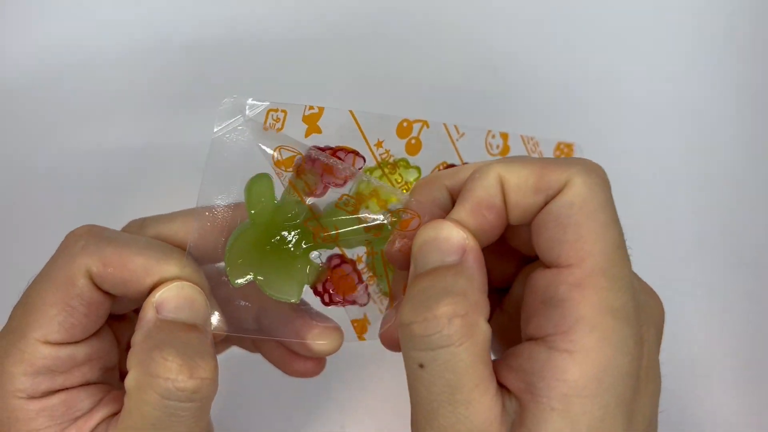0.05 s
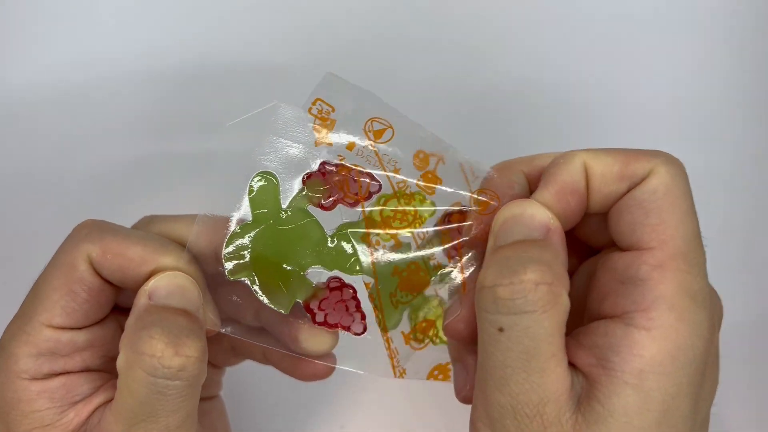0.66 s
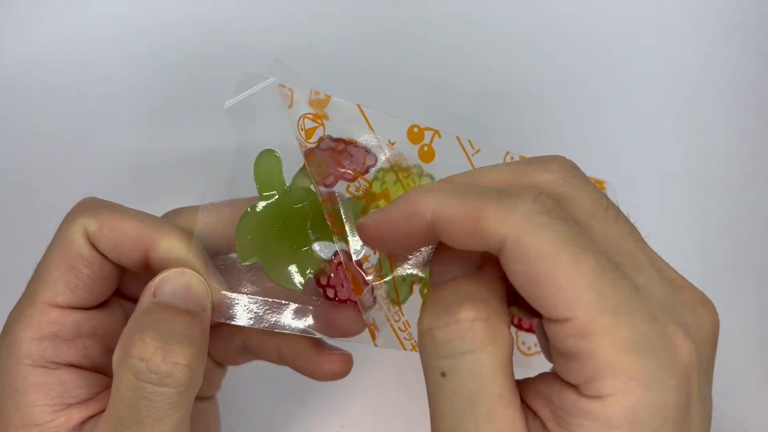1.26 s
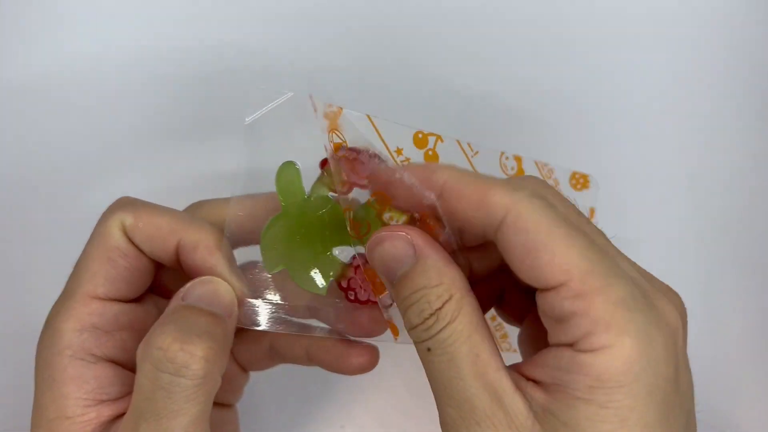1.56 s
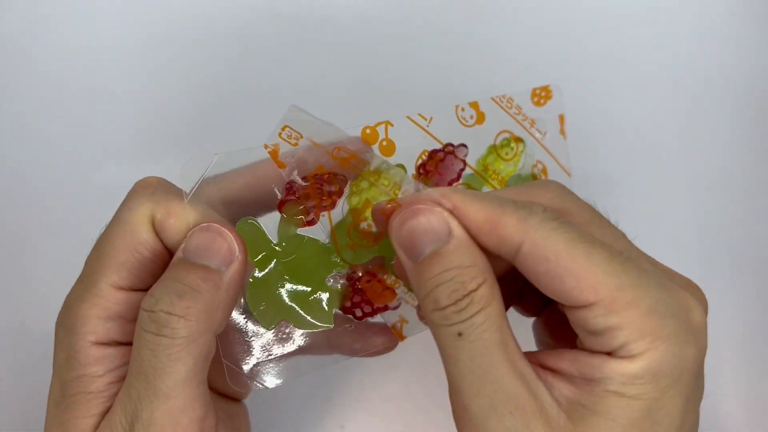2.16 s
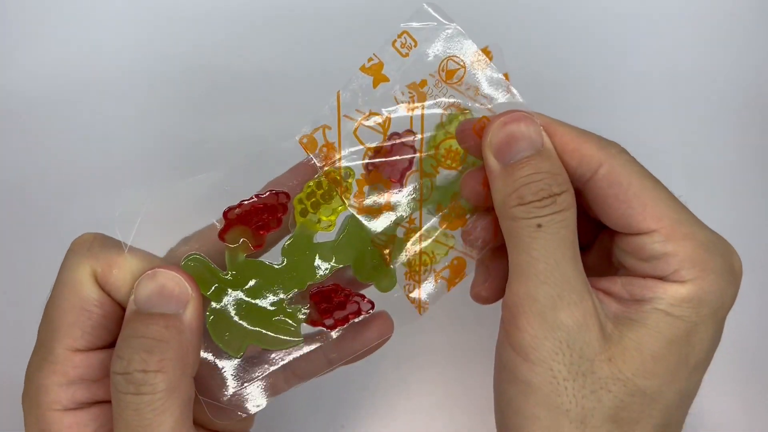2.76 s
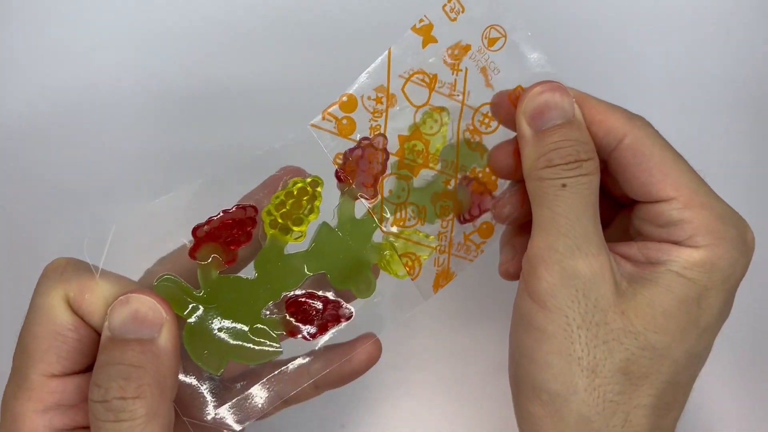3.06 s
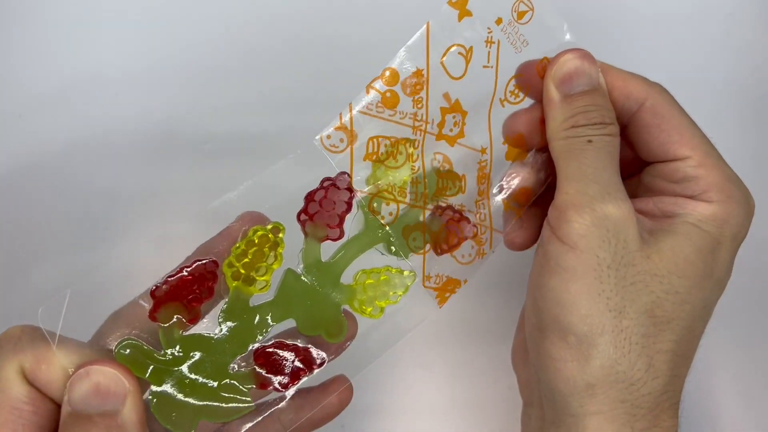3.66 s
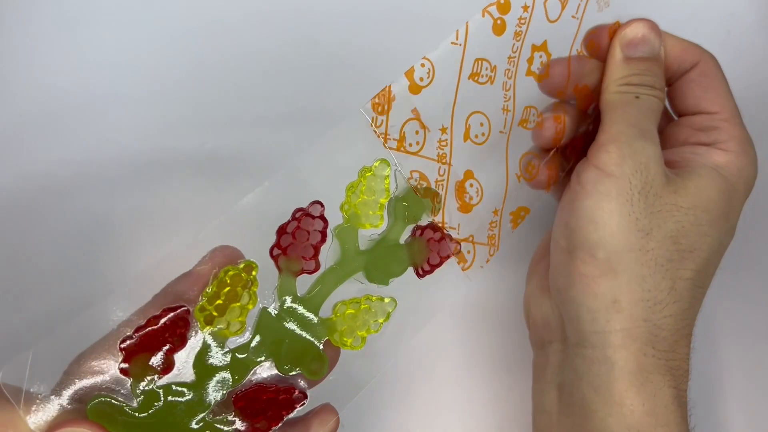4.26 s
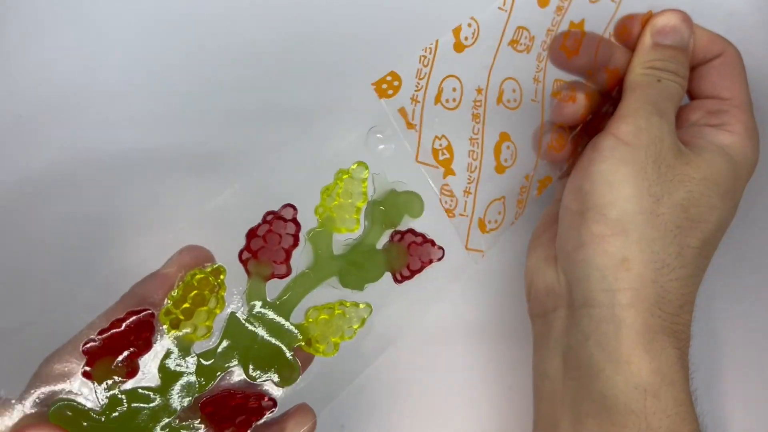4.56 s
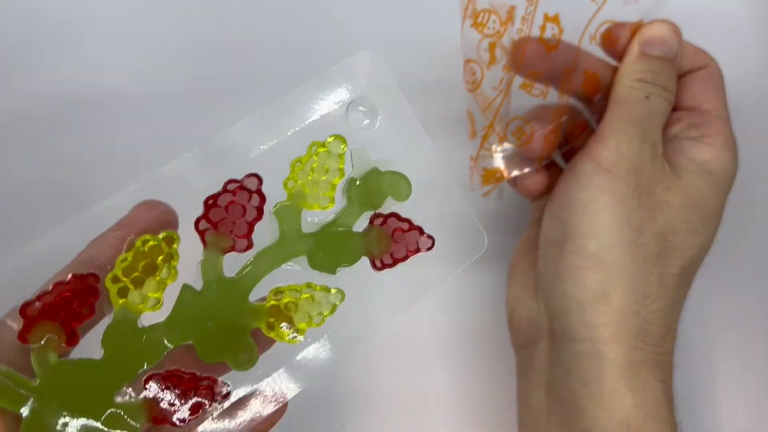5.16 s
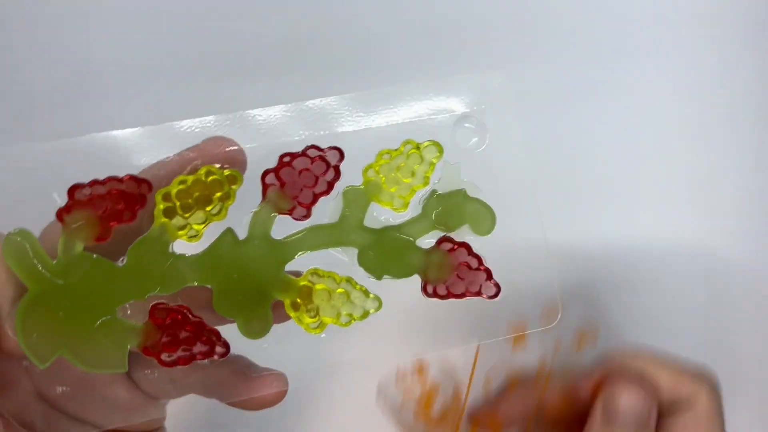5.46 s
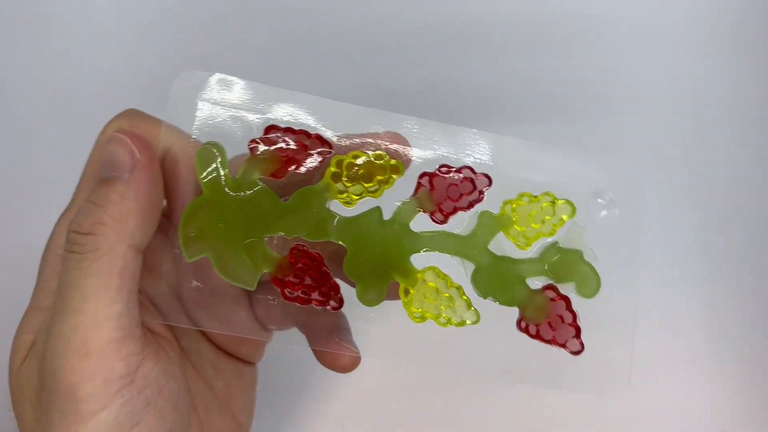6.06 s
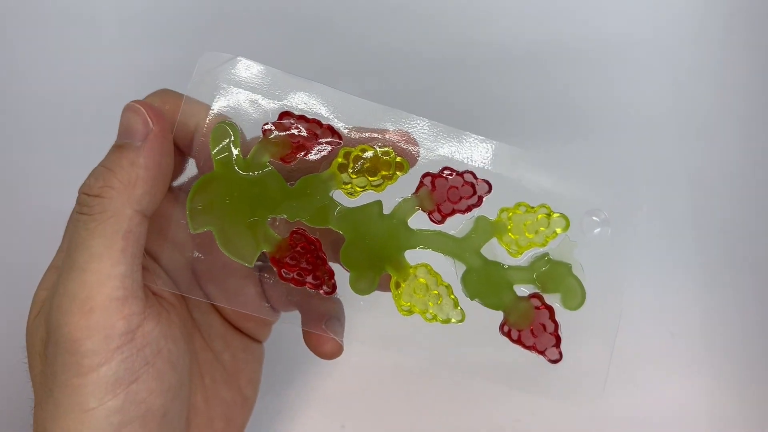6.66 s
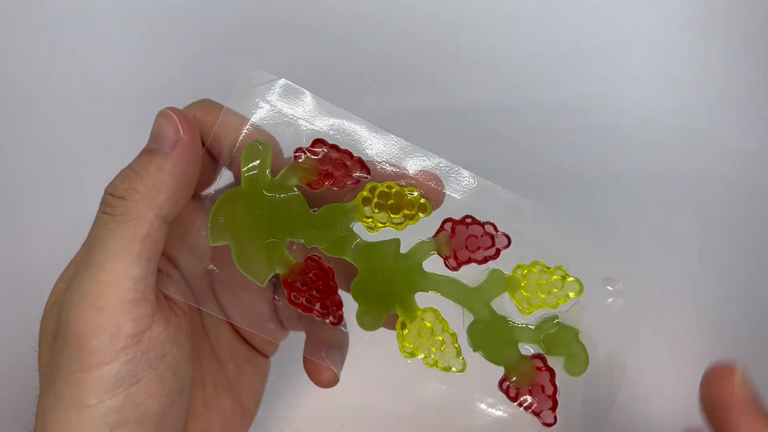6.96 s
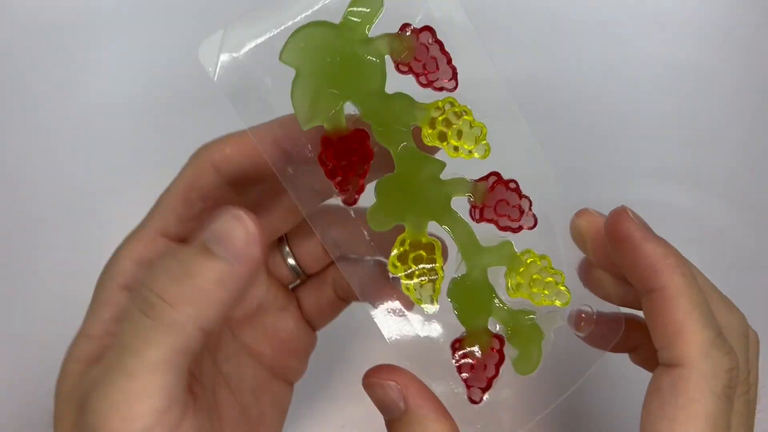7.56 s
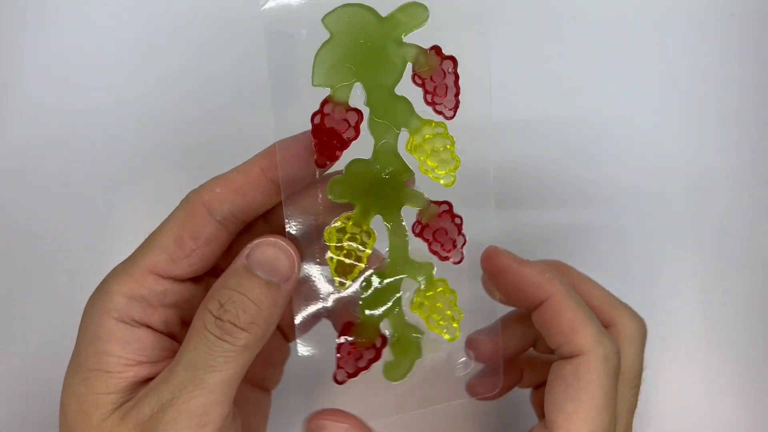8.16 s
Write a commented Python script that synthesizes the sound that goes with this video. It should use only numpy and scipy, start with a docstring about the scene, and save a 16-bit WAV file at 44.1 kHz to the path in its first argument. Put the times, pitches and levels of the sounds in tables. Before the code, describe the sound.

Close up in a quiet little room, plastic film crinkles and crackles in uneven clusters as it is pulled from a candy tray. Bright cracks and dull creaks of the bending tray build to a few short rips and a low thump as the film comes off. The rest is much quieter: skin sliding on plastic and scattered light clicks, over a faint rumble of handling.

```python
"""A small quiet room, close to a phone: thin plastic film is peeled off a moulded candy tray.
The seal lets go in bursts of snaps: each cracks, rings the taut film and knocks the tray, over a fine
crinkle of tiny slips. The last corner tears free with a thump. Then fingers rub the bare tray and turn
it, and it clicks a few times. A low handling rumble runs underneath."""
import sys
import numpy as np
from scipy import signal
from scipy.fft import rfft, irfft, next_fast_len
from scipy.io import wavfile
from scipy.ndimage import map_coordinates

SR = 44100
rng = np.random.default_rng(int(sys.argv[2]) if len(sys.argv) > 2 else 0)


def wav_record(signal):
    """Record a signal, one row per channel, as 16-bit PCM in the file named by sys.argv[1]."""
    frames = np.transpose(np.atleast_2d(signal))
    bounded = np.clip(frames, -1, 1)
    # unit amplitude maps onto the largest positive 16-bit level
    quanta = np.round(bounded * 32767).astype(np.int16)
    wavfile.write(sys.argv[1], SR, quanta)


N = 371322

# Cues and level rides; each layer adds its own trim.
# effort of the peel: t/s, pull on the film/dB, bending of the tray/dB
PEEL_EFFORT = [(0, -49, -58), (.2, -63, -54.5), (.3, -76.5, -70.5), (.48, -64.5, -71), (.7, -68, -53.5),
               (1.02, -77.5, -72), (1.17, -58, -63), (1.6, -58.5, -63), (1.78, -67, -63),
               (2.08, -57, -74.5), (2.37, -56.5, -51), (2.62, -71.5, -66.5), (2.88, -58, -54),
               (3.15, -63.5, -61), (3.7, -60.5, -49.5), (4.2, -65, -60), (4.52, -58.5, -64),
               (4.65, -73, -72.5), (4.88, -59, -60.5), (5.2, -91, -79)]
# the seal tears in a run of slips: middle t/s, length/s, level/dB
SEAL_RIPS = [(0.169, 0.024, -51.5), (2.344, 0.021, -53), (2.904, 0.051, -47.5), (3.696, 0.025, -42.5),
             (3.784, 0.068, -37.5), (4.497, 0.038, -37.5), (4.764, 0.04, -30.5)]
# handling rumble: t/s, level/dB
GRIP_LEVEL = [(0, -65.5), (1.75, -61), (2.03, -87), (2.8, -62), (3.5, -64), (3.78, -49), (4, -55),
              (4.3, -63), (4.52, -45.5), (4.68, -66), (4.84, -36.5), (5.15, -64.5), (6.3, -65.5),
              (8.42, -68)]
# the seal snaps, later the bare tray clicks under the fingers:
# t/s, crack/dB, ring/dB, ring f/Hz, tray knock/dB
PLASTIC_SNAPS = [(0.001, -50, -40.5, 1540, -40), (0.1226, -38.5, -41.5, 2840, -39),
                 (0.153, -35.5, -29, 3930, -33.5), (0.1803, -45, -37.5, 990, -24.5),
                 (0.2006, -31, -34, 1670, -30.5), (0.2152, -35, -41, 5500, -48),
                 (0.5044, -26.5, -33, 4300, -32.5), (0.6323, -34.5, -47, 3900, -39),
                 (0.6385, -34, -37, 3870, -55), (0.667, -27.5, -35, 4000, -46.5),
                 (0.7863, -55, -50, 3180, -64), (0.8449, -47, -43, 4430, -50.5),
                 (0.8741, -35, -30, 2740, -31), (1.0458, -84, -45, 2250, -43.5),
                 (1.229, -33, -34, 3020, -34.5), (1.381, -45, -31.5, 3040, -40.5),
                 (1.4148, -48.5, -42, 2440, -44.5), (1.5598, -34.5, -31.5, 3520, -35),
                 (1.6003, -50, -38, 2800, -43.5), (1.7271, -51, -60.5, 1310, -54),
                 (2.1457, -42, -55, 3500, -62), (2.179, -52.5, -43, 4300, -49),
                 (2.201, -31.5, -36.5, 3200, -31), (2.268, -40.5, -66, 1800, -49),
                 (2.3042, -28, -43.5, 1900, -34.5), (2.3235, -29.5, -39.5, 4280, -37),
                 (2.351, -44, -49.5, 1210, -40.5), (2.4, -27, -25.5, 4116, -28),
                 (2.4335, -43.5, -43, 1178, -36.5), (2.497, -36.5, -45.5, 3420, -41),
                 (2.5413, -46, -41.5, 1740, -34.5), (2.655, -49, -60, 4600, -57),
                 (2.7873, -50, -51, 1500, -47), (2.8248, -32.5, -48.5, 5220, -47),
                 (2.8431, -29.5, -45, 4300, -43), (2.88, -35, -45, 4300, -43.5),
                 (2.968, -37.5, -46, 3055, -48.5), (3.0355, -34, -46, 4850, -48),
                 (3.2058, -44.5, -49.5, 2846, -44.5), (3.2371, -18, -24, 2993, -27),
                 (3.279, -41.5, -39.5, 1300, -37), (3.345, -29.5, -43.5, 6100, -47),
                 (3.4311, -34.5, -40, 1040, -26.5), (3.4817, -41.5, -55.5, 1000, -38),
                 (3.6862, -34.5, -44.5, 1100, -33), (3.7446, -28.5, -34.5, 1210, -31),
                 (3.761, -34, -32, 1000, -20.5), (3.7912, -18, -38.5, 3745, -23.5),
                 (3.8364, -35.5, -50, 2380, -49.5), (4.012, -53.5, -58.5, 1025, -37),
                 (4.2371, -46, -63.5, 5900, -69), (4.262, -41, -47, 1500, -50.5),
                 (4.3406, -47, -47.5, 4400, -59.5), (4.3728, -26, -34, 1490, -31),
                 (4.4315, -25.5, -39.5, 1100, -29), (4.4658, -29, -38, 2560, -42),
                 (4.4769, -20.5, -34, 2215, -28.5), (4.4946, -25.5, -25, 1256, -28.5),
                 (4.541, -38, -50.5, 1170, -41), (4.5949, -68, -54.5, 1020, -42),
                 (4.718, -36.5, -41.5, 2600, -47), (4.745, -28, -30.5, 2170, -35),
                 (4.764, -19, -24.5, 1600, -27), (4.838, -45, -34.5, 1105, -32),
                 (5.0522, -58, -57, 2400, -61), (5.191, -67, -51, 2210, -48.5),
                 (5.2979, -55, -70, 1010, -48.5), (5.337, -55.5, -59.5, 3300, -63),
                 (5.7672, -57, -64, 5100, -88), (5.7797, -54, -64, 5500, -84),
                 (6.1233, -65, -45, 2670, -56), (7.218, -68, -65, 1600, -61),
                 (7.7201, -56.5, -56, 1000, -32), (7.743, -65, -61, 1230, -56),
                 (7.9027, -54.5, -48, 2400, -46), (8.014, -67, -58.5, 1410, -57),
                 (8.037, -64, -62.5, 1600, -58), (8.234, -67, -59, 1610, -61.5),
                 (8.387, -74, -67.5, 1210, -59)]
# the tray buckles under the fingers: t/s, level/dB, f/Hz
TRAY_FLEXES = [(.1226, -32.5, 404), (.659, -42.5, 613), (.884, -37, 208), (1.024, -48.5, 497),
               (1.214, -45.5, 625), (1.4832, -42, 420), (1.565, -45, 327), (1.719, -52, 276),
               (2.161, -36.5, 424), (2.45, -32, 607), (2.892, -28.5, 326), (2.975, -40, 284),
               (3.239, -32.5, 237), (3.432, -30.5, 432), (3.62, -42, 358), (3.708, -35, 623),
               (3.767, -34, 133), (3.808, -27, 265), (4.158, -37, 339), (4.398, -36, 584),
               (4.498, -31, 333), (4.53, -37.5, 94), (4.793, -25, 176.4), (4.821, -25, 62.2),
               (5.376, -46.5, 603), (6.735, -56.5, 123.2)]
# skin and film slide over the tray: middle t/s, half length/s, body level/dB, body f/Hz, hiss/dB
SLIDES = [(2.004, 0.034, -52, 2190, -69), (2.057, 0.032, -50.5, 2240, -83),
          (2.136, 0.029, -51.5, 2800, -56), (2.223, 0.012, -49, 4330, -42), (5.223, 0.06, -64.5, 1480, -88),
          (5.283, 0.075, -67, 3480, -64), (5.555, 0.1, -64, 4000, -58), (5.855, .039, -59.5, 2197, -69),
          (6.056, 0.072, -65.5, 1510, -75), (6.152, 0.047, -56.5, 2670, -85),
          (6.281, 0.033, -54, 2620, -64.5), (6.335, 0.1, -62.5, 2770, -72.5),
          (7.312, 0.045, -59, 1800, -61), (7.352, 0.03, -58.5, 2640, -57.5), (7.645, 0.1, -71, 1500, -90),
          (7.889, 0.021, -58.5, 1590, -74), (8.077, 0.057, -67, 1600, -65), (8.289, 0.036, -66, 1530, -78)]
# fingers pressing on the bare tray: t/s, level/dB
FINGER_PRESSURE = [(4.9, -84.5), (5.45, -69), (5.75, -81), (5.97, -67.5), (6.27, -66), (6.5, -83),
                   (7.1, -91.5), (7.25, -80), (8.42, -91)]
# freedom of the tray from film and fingers: t/s, share (0 held, 1 free)
TRAY_FREEDOM = [(0, 0.14), (3.1, 0.31), (3.8, 1), (4.8, 1), (5.5, 0), (8.4, 1)]

# modes of the tray: f/Hz, level/dB, t60/s before damping
TRAY_MODES = [(176, -7, .11), (307, -6, .08), (645, 1, .15), (1108, 2, .2), (1290, -7, .08),
              (1620, -7, .08), (1983, -11, .05), (2293, -11, .05), (3536, -6, .06), (3910, -5, .04),
              (4996, -1, .05), (8124, -11, .04)]
# partials of the skin's whistle: f/Hz, level/dB
WHISTLE_PARTIALS = [(12800, -86), (14300, -79), (15100, -84)]
# Tone colours: f/Hz, relative level/dB
CRACK_EQ = [(3000, -34), (6000, -13), (8300, -1), (10000, -6), (11300, -1), (12200, -1.5), (13200, -1.5),
            (14300, -3.5), (15600, -3), (16200, -19)]  # bright cracking plastic
RING_EQ = [(400, -31.5), (900, -12.5), (1300, 1), (2400, 2), (3200, -2), (4200, 5), (5700, -4.5),
           (7000, -5), (10000, -23.5)]  # ringing thin plastic
RUB_EQ = [(400, -19), (1100, -3.5), (2200, 0), (4500, -3), (6500, -10), (10000, -21)]  # midrange friction
CREAK_EQ = [(120, -17), (300, 1), (500, -1.5), (640, 2), (820, -17), (1200, -15.5), (2500, -36)]  # dull creak of the tray
RUMBLE_EQ = [(20, -15), (40, -5), (60, 1.5), (100, -2.5), (180, -13), (300, -19.5), (700, -47.5)]  # the grip
ROOM_TONE_EQ = [(30, 0), (100, -6.5), (250, -18), (700, -23.5), (2000, -29), (6000, -47.5), (10000, -49.5),
                (14000, -38), (16500, -52)]  # quiet background
WALL_EQ = [(100, -19.5), (600, -13.5), (1800, -8), (4000, -14.5), (6300, -9), (9000, -24.5), (14000, -23.5)]  # reverb return
# decay of the room: f/Hz, t60/s
ROOM_DECAY = [(150, 0.37), (700, 0.13), (3000, 0.21), (8000, 0.22), (15000, 0.059)]
# lead of the left microphone port over the right: f/Hz, phase/rad
PORT_LEAD = [(100, 0), (700, .6), (1100, .8), (1400, -.9), (2200, 0), (3200, 1.4), (5000, .8), (6500, 0),
             (8000, -.7), (10050, -3.14), (13000, -6.1), (15800, -8.9)]
# shading between the ports: f/Hz, left minus right level/dB
PORT_SHADING = [(100, 0), (380, 1.6), (700, 5), (1100, 9), (2400, 5.5), (4400, 7), (7000, 2.5), (9000, 0),
                (15000, 0)]

CRINKLE_DB, RUSTLE_DB, POP_DB, CREAK_DB = -0.5, -4, -6.5, 1.5  # against the pull; creak against bending
CRACK_T60_S, HALVING_DB = 0.028, 48.5  # decay of a crack cued at -40 dB; each HALVING_DB up halves it
KNOCK_HZ, KNOCK_SCATTER_OCT, RATTLE_HZ = 619.3, 0.07, 496  # the tray's wall and the dull rattle around it
TIP_HZ, TIP_FREE_DB, TIP_HELD_DB = 1108, 8.5, -11  # the tray's far end sings out once the film is off
SKIN_HISS_DB, SKIN_RUB_DB, SKIN_CREAK_DB = -6.5, -2.5, -5  # against the finger pressure
WHISTLE_AT_S, WHISTLE_HALF_WIDTH_S = 6.45, 0.38
TOP_HZ = 16700


def amp(db):
    """Decibels to gain."""
    return 10 ** (np.asarray(db) / 20)


def unit(x):
    """Scaled to rms 1."""
    return x / np.sqrt(np.mean(x ** 2) + 1e-20)


def hit(x):
    """Scaled to the energy of a hundredth of a second at rms 1."""
    return x * np.sqrt(SR / 100 / (np.sum(x ** 2, axis=-1).mean() + 1e-20))


def along(points, hz):
    """Reads (f/Hz, value) points on a log axis."""
    freqs, values = np.transpose(points)
    return np.interp(np.log(hz + 1), np.log(freqs), values)


def bell(hz, centre_hz, octaves, order=2):
    """An EQ bell of height 1, at half height `octaves` to either side."""
    return 1 / (1 + (np.log2((hz + 1) / centre_hz) / octaves) ** order)


def rides(rows):
    """One value per sample for each column after the time."""
    times, *columns = np.transpose(rows)
    return [np.interp(np.arange(N) / SR, times, column) for column in columns]


def wobble(rate):
    """A smooth random curve, rate knots a second."""
    return map_coordinates(rng.standard_normal(int(N * rate / SR) + 4), [np.arange(N) * rate / SR])


def swell(middle, half_width):
    """A bell-shaped rise and fall around a moment."""
    return np.exp(-((np.arange(N) / SR - middle) / half_width) ** 2)


def fade(t, attack, t60):
    """A quick rise and an exponential decay."""
    return (1 - np.exp(-t / attack)) * amp(-60 * t / t60)


def filtered(x, response):
    """x through a frequency response."""
    size = x.shape[-1]
    padded = next_fast_len(size + 2048)
    return irfft(rfft(x, padded) * response(np.fft.rfftfreq(padded, 1 / SR)), padded)[..., :size]


def stereo_noise(size, width):
    """White noise with `width` as its side-to-mid ratio."""
    mid, side = rng.standard_normal((2, size))
    return np.array([mid + width * side, mid - width * side])


def eq_noise(size, eq, width):
    """Stereo noise in a tone colour, at rms 1."""
    return unit(filtered(stereo_noise(size, width), lambda hz: amp(along(eq, hz))))


def grains(rate, spread_db, t60):
    """The envelope of many tiny slips of very unequal size."""
    sizes = (rng.random(N) < rate / SR) * amp(spread_db * np.minimum(rng.standard_exponential(N), 3.5))
    grain = fade(np.arange(SR // 20) / SR, 0.000078, t60)
    return unit(np.sqrt(np.abs(signal.fftconvolve(sizes ** 2, grain ** 2)[:N])))


def add(track, s, sound):
    """Mixes a sound into the track from second s on."""
    part = track[:, max(round(s * SR), 0):][:, :sound.shape[-1]]
    part += sound[..., :part.shape[1]]


def peel():
    """Pulled film crinkles and rustles in clusters of slips, louder in a rip; the bent tray creaks along."""
    pull_db, bend_db = rides(PEEL_EFFORT)
    rips = sum(amp(db) * swell(s, length / 2) for s, length, db in SEAL_RIPS)
    slips = unit(grains(rate=290, spread_db=5.5, t60=0.04) * amp(5.6 * wobble(30)))
    tear = rips * unit(grains(rate=820, spread_db=4, t60=.01) + 0.33)
    pops = amp(pull_db + POP_DB) * grains(rate=22, spread_db=3, t60=.025)  # small creases
    crinkle = eq_noise(N, CRACK_EQ, width=0.064) * (amp(pull_db + CRINKLE_DB) * slips + tear)
    rustle_gain = amp(pull_db + RUSTLE_DB) * unit(slips + .5) + pops + amp(-1.5) * tear
    rustle = eq_noise(N, RUB_EQ, width=0.65) * rustle_gain
    creak = eq_noise(N, CREAK_EQ, width=0.15) * (amp(bend_db + CREAK_DB) * unit(slips + 0.065) + tear)
    return crinkle + rustle + creak


def grip_rumble():
    """Handling lays down an unsteady low bed that peaks as the last corner comes free."""
    return amp(rides(GRIP_LEVEL)[0] + 1.7 * wobble(9)) * eq_noise(N, RUMBLE_EQ, width=0.084)


def knock(t, hz, attack, t60, sag):
    """A wall of the tray swings in two modes; its pitch sags as the tension lets go."""
    pitch = hz * (1 + sag * (np.exp(-t * hz / 4) - .5))
    phase = 2 * np.pi * np.cumsum(pitch) / SR
    upper = amp(-17.0) * np.sin(1.4 * phase) * fade(t, attack, 0.37 * t60)
    return hit(np.sin(phase) * fade(t, attack, t60) + upper)


def snaps():
    """Seal snaps, then bare-tray clicks: each a bright crack, a short ring of crowded modes and a knock."""
    out, t = np.zeros((2, N)), np.arange(SR // 10) / SR
    for s, crack_db, ring_db, ring_hz, tray_db in PLASTIC_SNAPS:
        tray_hz = KNOCK_HZ * 2 ** (KNOCK_SCATTER_OCT * rng.uniform(-1, 1))
        t60 = CRACK_T60_S * 2 ** (-(crack_db + 40) / HALVING_DB)
        # the plastic gives way in several tiny steps within a few milliseconds
        steps = amp(3 * map_coordinates(rng.uniform(-1, 1, len(t)), [t * 2200], order=1))
        crack = hit(eq_noise(len(t), CRACK_EQ, width=.13) * steps * fade(t, attack=.00045, t60=t60))
        resonance = lambda hz: amp(along(RING_EQ, hz) + 12 * bell(hz, ring_hz, octaves=0.54))
        # most of the ring dies with the crack, a little lingers
        swing = fade(t, attack=0.00017, t60=1.11 * t60) + 0.069 * fade(t, attack=.003, t60=0.13)
        ring = hit(filtered(stereo_noise(len(t), width=0.33), resonance) * steps * swing)
        wall = knock(t, tray_hz, attack=.0025, t60=.032, sag=.12)
        dull = lambda hz: bell(hz, RATTLE_HZ, octaves=.75, order=4)
        rattle = hit(filtered(stereo_noise(len(t), width=0.42), dull) * fade(t, attack=0.00024, t60=.04))
        bright = amp(crack_db - 0.63) * crack + amp(ring_db + 0.1) * ring
        add(out, s, bright + amp(tray_db - 2.5) * hit(wall + 0.85 * rattle))
        # a faint tick leads the snap, and three more follow as the plastic settles
        add(out, s - rng.uniform(.001, .004), amp(-24) * bright)
        tick = amp(ring_db) * ring + amp(crack_db - 6) * crack
        for delay, size_db in rng.uniform([.006, -24], [.05, -12], size=(3, 2)):
            add(out, s + delay, amp(size_db - 320 * delay) * tick)
    return out


def tray_ring(contacts):
    """Every contact rings the whole tray; film and fingers choke the ring until it swings free."""
    t = np.arange(SR // 4) / SR

    def ring(share, decay_scale, tip_db):
        impulse = np.zeros(len(t))
        for hz, db, t60 in TRAY_MODES:
            gain = amp(db + tip_db * (hz == TIP_HZ)) / (t60 * SR)
            impulse += gain * np.cos(2 * np.pi * hz * t) * fade(t, 0.00044, decay_scale * t60)
        return signal.fftconvolve(contacts * share, impulse[None], axes=1)[:, :N]

    free = rides(TRAY_FREEDOM)[0]
    return amp(28.5) * ring(free, 0.72, TIP_FREE_DB) + amp(27.0) * ring(1 - free, .55, TIP_HELD_DB)


def flexes():
    """Soft buckling of the tray with a dull creak: larger, lower panels swing for longer."""
    out, t = np.zeros((2, N)), np.arange(SR // 5) / SR
    give = np.sin(np.pi / 2 * np.minimum(t / .005, 1)) ** 2  # the panel gives way over 5 ms
    for s, db, hz in TRAY_FLEXES:
        panel = hit(give * knock(t, hz, attack=0.002, t60=0.0052 + 7 / hz, sag=0.077))
        creak = hit(eq_noise(len(t), CREAK_EQ, width=0.13) * give * fade(t, attack=0.0023, t60=.05))
        add(out, s - .002, amp(db - 1.0) * (panel + amp(-8) * creak))
    return out


def slides():
    """A slide swells and fades: skin catches in tiny slips on the tray, and the plastic hisses."""
    out = np.zeros((2, N))
    catches = unit(grains(rate=500, spread_db=3, t60=.014) + .8)
    for middle, half_length, body_db, body_hz, hiss_db in SLIDES:
        start, size = middle - half_length, int(2 * half_length * SR)
        stroke = np.hanning(size) ** 2 * unit(catches[int(start * SR):][:size])
        panel = lambda hz: amp(along(RUB_EQ, hz) + 8 * bell(hz, body_hz, octaves=.5))
        body = unit(filtered(stereo_noise(size, width=0.43), panel))
        hiss = eq_noise(size, CRACK_EQ, width=0.063)
        creak = amp(-11.5) * eq_noise(size, CREAK_EQ, width=.15)
        add(out, start, stroke * (amp(body_db) * (body + creak) + amp(hiss_db) * hiss))
    return out


def finger_rub():
    """Skin slides almost smoothly on the bare tray: airy hiss, midrange rub and low creak."""
    friction = amp(rides(FINGER_PRESSURE)[0]) * unit(grains(rate=230, spread_db=6, t60=.03) + 1.25)
    hiss = amp(SKIN_HISS_DB) * eq_noise(N, CRACK_EQ, width=0.092)
    rub = amp(SKIN_RUB_DB) * eq_noise(N, RUB_EQ, width=.43)
    creak = amp(SKIN_CREAK_DB) * eq_noise(N, CREAK_EQ, width=.15)
    return friction * (hiss + rub + creak)


def skin_whistle():
    """Sliding skin gives one faint, very high whistle that wavers in level and pitch."""
    whistle = np.zeros(N)
    for hz, db in WHISTLE_PARTIALS:
        gain = amp(db + 5 * wobble(25))
        pitch = hz * (1 + 0.017 * (wobble(9) + .6 * wobble(900)))
        whistle += gain * np.sin(2 * np.pi * np.cumsum(pitch) / SR)
    return swell(WHISTLE_AT_S, WHISTLE_HALF_WIDTH_S) * whistle


def mic_ports(near):
    """Near sound reaches the phone's two ports with different delay and shading."""
    def response(hz):
        left = amp(along(PORT_SHADING, hz) / 2) * np.exp(.5j * along(PORT_LEAD, hz))
        rms = np.sqrt((abs(left) ** 2 + abs(left) ** -2) / 2)
        return np.array([left, 1 / left]) / rms

    return filtered(near, response)


def room_reverb(near):
    """A short diffuse tail, different at each port, longest in the bass and shortest at the very top."""
    hz, t, spectrum = signal.stft(stereo_noise(SR // 2, width=0.93), SR, nperseg=256)
    decay = amp(-60 * t / along(ROOM_DECAY, hz)[:, None])
    tail = signal.istft(spectrum * decay, SR, nperseg=256)[1]
    tail = np.pad(tail / np.linalg.norm(tail[0]), ((0, 0), (SR // 150, 0)))  # pre-delay
    wet = signal.fftconvolve(near.mean(0)[None], tail, axes=1)[:, :N]
    return filtered(wet, lambda hz: amp(along(WALL_EQ, hz)))


def scene():
    """Film, tray and fingers up close, with the room's reverb and a quiet room tone."""
    contacts = snaps() + slides() + flexes()
    near = contacts + tray_ring(contacts) + peel() + finger_rub() + skin_whistle() + grip_rumble()
    return mic_ports(near) + room_reverb(near) + amp(-76.0) * eq_noise(N, ROOM_TONE_EQ, width=0.18)


def record(dry):
    """The phone drops the deepest bass and keeps nothing above its band limit."""
    low_cut = signal.butter(3, 40, "highpass", fs=SR, output="sos")
    return filtered(signal.sosfilt(low_cut, dry), lambda hz: 1 / (1 + (hz / TOP_HZ) ** 160))


dry = scene()
out = record(dry)
wav_record(out)
```